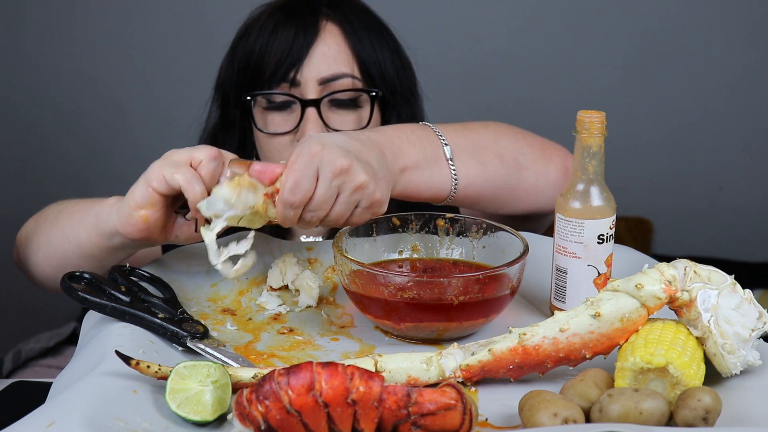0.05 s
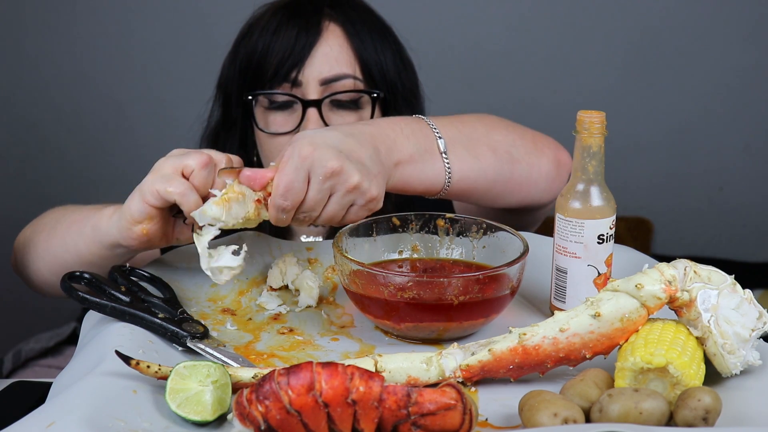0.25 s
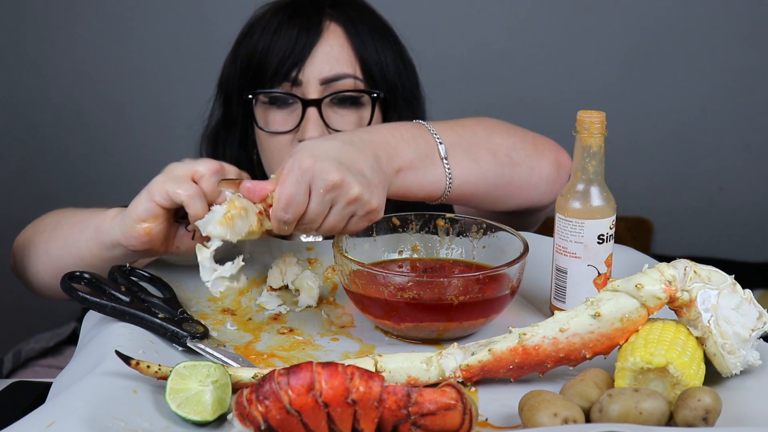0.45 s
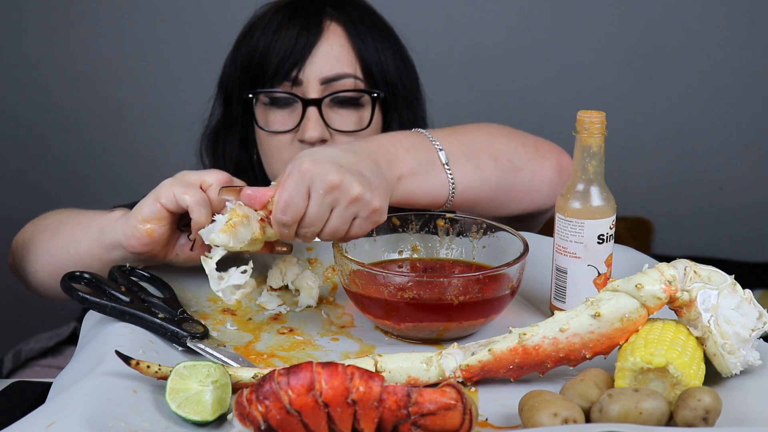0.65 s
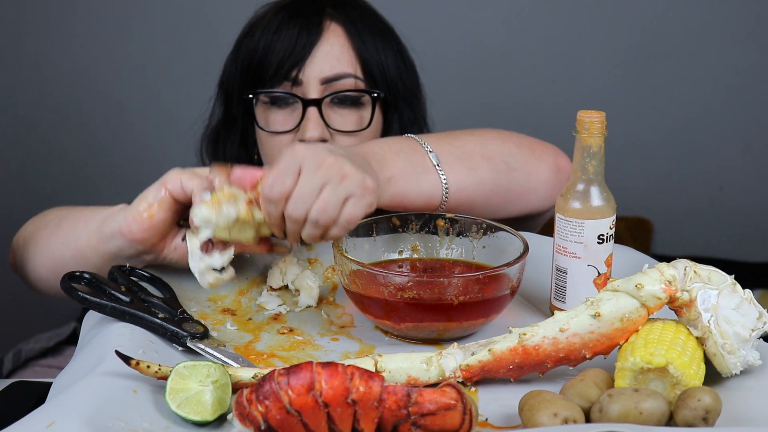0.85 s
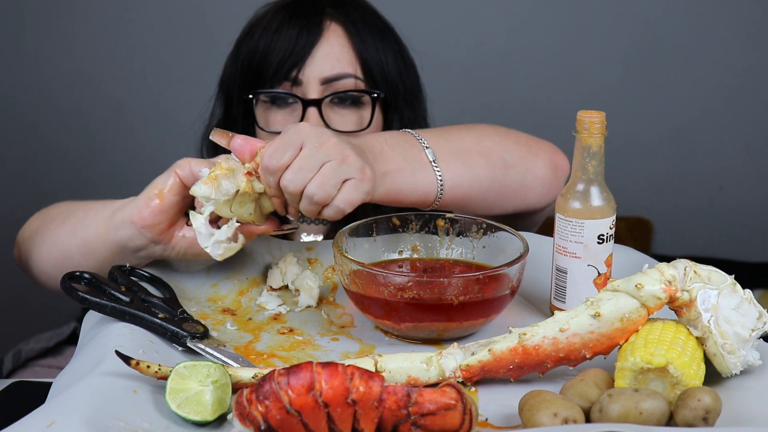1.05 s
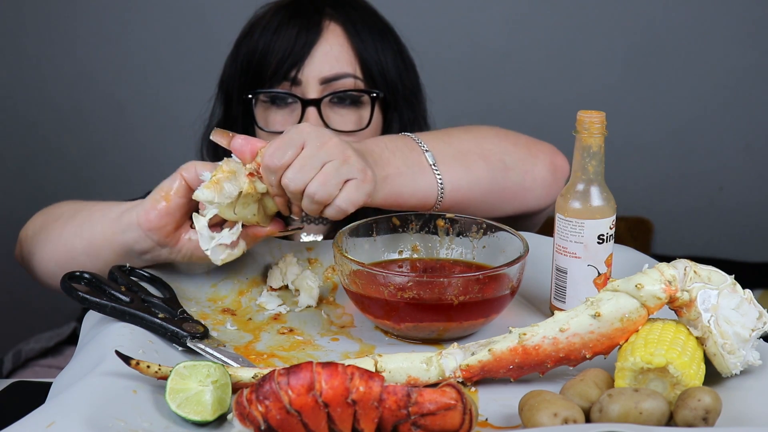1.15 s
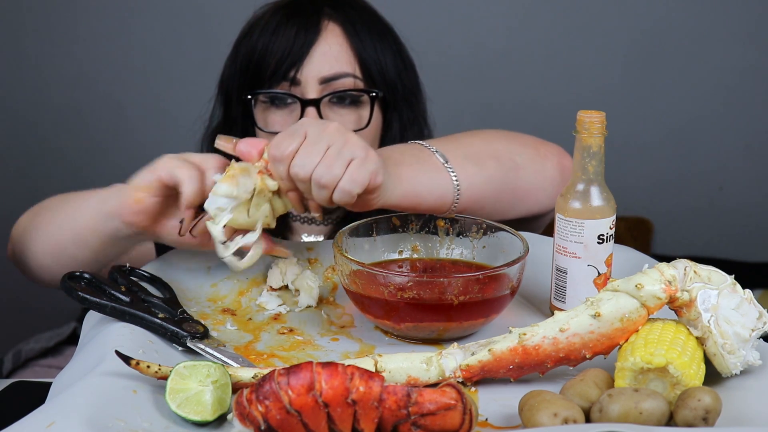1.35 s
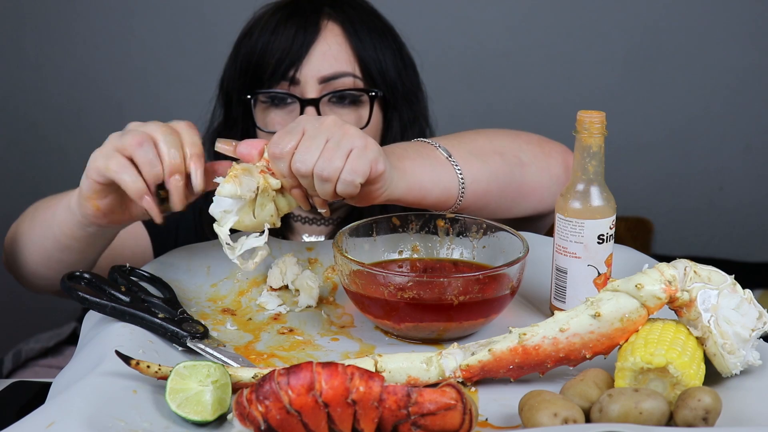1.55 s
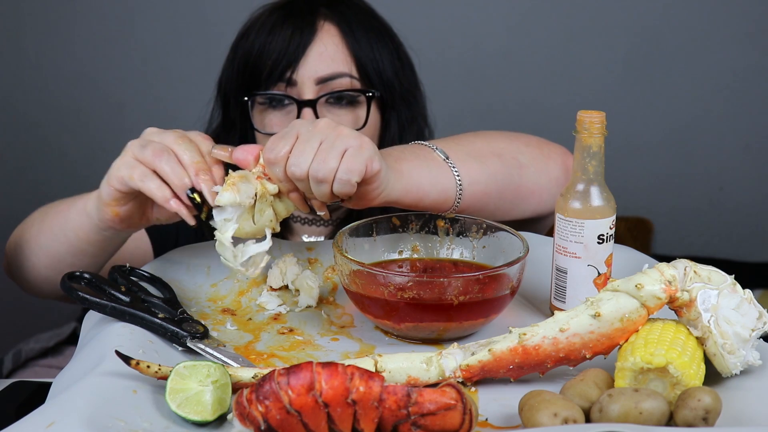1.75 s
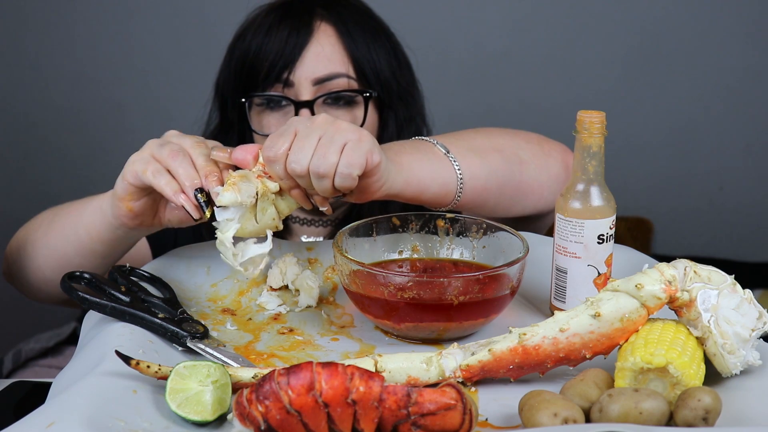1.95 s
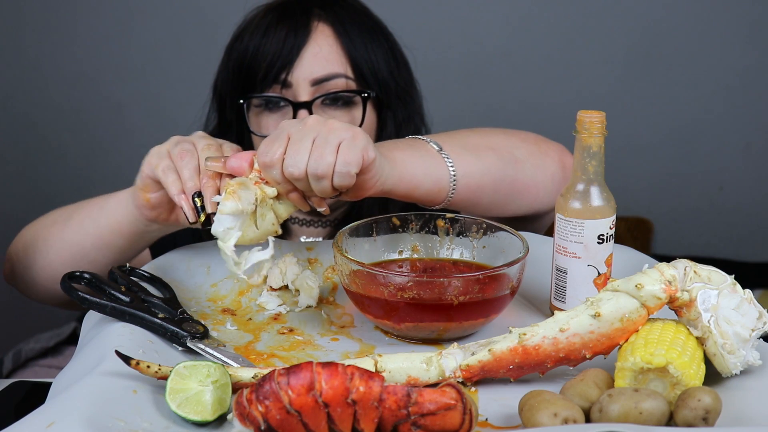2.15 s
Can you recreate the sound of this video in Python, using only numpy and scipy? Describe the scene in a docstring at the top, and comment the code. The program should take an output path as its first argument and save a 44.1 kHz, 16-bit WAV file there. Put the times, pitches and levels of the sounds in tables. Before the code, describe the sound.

A crab shell cracks loudly as it is pulled apart by hand, then small crackles and ticks.

```python
"""In a small bare room, a crab shell is pulled apart by hand at a table, close to a microphone.
Cracks, snaps and ticks are short noise bursts filtered by shell resonances and the room; peaks clip.
A low overload thump lies under the first big crack, a hollow shell knock under the second;
both are noise bursts through one low colour. A brushed glass bowl rings as decaying sine modes.
Beneath lie a wavering low ventilation drone of shaped noise, a sine hum and air hiss."""
import sys
import numpy as np
from scipy import signal
from scipy.fft import rfft, irfft
from scipy.io import wavfile
from scipy.ndimage import uniform_filter1d

SR = 44100
rng = np.random.default_rng(int(sys.argv[2]) if len(sys.argv) > 2 else 0)


def wav_out(sig):
    """Save sig, one row per channel (or a flat mono array), as 16-bit PCM at SR to the path in sys.argv[1]."""
    wavfile.write(sys.argv[1], SR, np.round(np.clip(np.atleast_2d(sig).T, -1, 1) * 32767).astype(np.int16))


N = 97020


def amp(db):
    """Logarithmic level: decibels become a linear gain."""
    return 10 ** (np.asarray(db) / 20)


def unit(x):
    """Power normalisation: scales a signal to an rms of one."""
    return x / np.sqrt(np.mean(x ** 2) + 1e-20)


def read(points, hz):
    """Spectral interpolation: reads a table along a log-frequency axis."""
    f, value = np.transpose(points)
    return np.interp(np.log(hz + 1), np.log(f + 1), value)


def add(mix, s, sound):
    """Superposition: sums a sound into the mix from s seconds on."""
    part = mix[max(round(s * SR), 0):][:len(sound)]
    part += sound[:len(part)]


def causal(db, size=2048):
    """Minimum phase: the Hilbert transform of log gain gives the sharpest causal impulse response."""
    mirrored_db = np.r_[db, db[-2:0:-1]]
    log_gain = np.log(amp(mirrored_db))
    spectrum = np.exp(np.conj(signal.hilbert(log_gain)))
    return np.fft.ifft(spectrum).real[:size]


def noise(points):
    """Spectral shaping: steady white noise weighted by a table, at unit rms."""
    white = rfft(rng.standard_normal(N))
    gain = amp(read(points, np.fft.rfftfreq(N, 1 / SR)))
    return unit(irfft(white * gain, N))


# Relative noise spectra of the drone and the air hiss: frequency_hz, density_db (per Hz)
DRONE_SPECTRUM = [(20, -17.5), (50, -14), (75, -21), (100, -6.5), (118, -4.5), (130, -1), (152, -0.5),
                  (185, -20), (235, -21), (320, -29), (600, -54.5)]
HISS_SPECTRUM = [(100, -4), (420, 0), (650, -6), (1100, -8.5), (2000, -13.5), (5000, -20), (10000, -24),
                 (16000, -27.5)]
# Slow wavering of drone and hum: time_s, gain_db
DRONE_SWELL = [(0, -5.5), (.1, -1.5), (.33, 1.5), (.5, 0), (.72, 2.5), (.79, -1), (.9, 2), (1.1, 2),
               (1.3, 1.5), (1.42, 4.5), (1.53, -2), (1.64, 2.5), (1.9, 0), (2.2, 1)]
DRONE_DB, HISS_DB = -48, -60.5  # rms levels, the drone's before its swell
HUM_HZ, HUM_DB = 129.1, -51.5  # rms level before the swell


def ventilation():
    """Amplitude modulation: a drone of shaped noise and a fan hum waver together over steady hiss."""
    t = np.arange(N) / SR
    hum = amp(HUM_DB) * unit(np.sin(2 * np.pi * HUM_HZ * t))
    drone = amp(DRONE_DB) * noise(DRONE_SPECTRUM) + hum
    swell = amp(np.interp(t, *np.transpose(DRONE_SWELL)))
    return drone * swell + amp(HISS_DB) * noise(HISS_SPECTRUM)


# Reverberation time of the room: frequency_hz, t60_s
ROOM_DECAY = [(300, 0.29), (1000, 0.39), (3000, 0.38), (7000, 0.37), (15000, 0.25)]
# Relative initial colour of the room tail: frequency_hz, gain_db
ROOM_TONE = [(100, -8.5), (500, 2.5), (1500, 0.5), (3500, 0), (7000, 2), (15000, 2)]
ROOM_DB, ROOM_BUILD_S = -7.5, 0.0088  # level before each source's own room gain; linear build-up


def room(size=26000):
    """Diffuse reverberation: noise builds up, then decays exponentially at its own rate in each band."""
    hz, t, bands = signal.stft(unit(rng.standard_normal(size)), SR, nperseg=256)
    decay_db = -60 * t / read(ROOM_DECAY, hz)[:, None]
    gain = amp(read(ROOM_TONE, hz)[:, None] + decay_db)
    tail = signal.istft(bands * gain, SR, nperseg=256)[1]
    tail = tail * np.minimum(np.arange(len(tail)) / SR / ROOM_BUILD_S, 1)
    return amp(ROOM_DB) * tail / np.linalg.norm(tail)


SNAP_RISE_S, SNAP_HOLD_S = 0.00015, 0.0008  # the hold is counted from the onset
HAND_RING_S = 0.001  # added to every t60


def burst(t60, size=2048):
    """Impulsive excitation: a sub-millisecond tear rings dense, hand-damped modes, even in spectrum."""
    t = np.arange(size) / SR
    rise = np.minimum(t / SNAP_RISE_S, 1)
    decay = amp(-60 * np.maximum(t - SNAP_HOLD_S, 0) / (t60 + HAND_RING_S))
    ring = rng.choice([-1, 1], size) * rise * decay
    # Inverting the smoothed spectrum leaves the colour to the body that follows
    broad_db = 10 * np.log10(uniform_filter1d(abs(rfft(ring)) ** 2, size=48) + 1e-12)
    return signal.fftconvolve(ring, causal(-broad_db))[:size]


# Colour of the shell, before each piece's own tone: frequency_hz, gain_db
SHELL_COLOUR = [(40, -33.5), (200, -30.5), (450, -28.5), (1000, -23), (1600, -14), (2200, -5.5), (2600, -6),
                (3200, -1.5), (4100, -3), (4800, -8.5), (6300, -7.5), (8500, -7), (11500, -9),
                (15500, -13.5)]
BASS_HZ, BODY_HZ, TREBLE_HZ, TOP_HZ = 1200, 1950, 6000, 10000  # anchors of each piece's tone
# Resonance peaks: spread divides the height and multiplies the half-width
LOW_RING_DB, LOW_WIDTH_HZ, HIGH_RING_DB, HIGH_WIDTH_HZ = 7, 220, 7.5, 230
SNAP_DB = 0.5  # gain common to all snaps


def piece(level_db, bass_db, treble_db, top_db, low_hz, high_hz, spread, size=2048):
    """Resonance: the breaking piece filters by the shell's colour, its own tone and two peaks."""
    hz = np.fft.rfftfreq(size, 1 / SR)
    tone = [(BASS_HZ, bass_db), (BODY_HZ, 0), (2 * BODY_HZ, 0),
            (TREBLE_HZ, treble_db), (TOP_HZ, top_db)]
    rings = [(LOW_RING_DB, low_hz, LOW_WIDTH_HZ), (HIGH_RING_DB, high_hz, HIGH_WIDTH_HZ)]
    peaks_db = sum(db / spread / (1 + ((hz - centre) / (width * spread)) ** 2)
                   for db, centre, width in rings)
    response = causal(read(SHELL_COLOUR, hz) + read(tone, hz) + peaks_db)
    return amp(SNAP_DB + level_db) * np.sqrt(size / 2) * response


# Early reflections, relative to the direct sound: delay_s, level_db
ECHOES = [(.006, -26.5), (.012, -16.5), (.0147, -24.5)]
DIRECT_SPREAD = 0.95
# The room gathers sound from all sides of the piece, so its resonances come back wider and flatter
ROOM_SPREAD = 3.3


def fracture(level_db, bass_db, treble_db, top_db, t60, low_hz, high_hz, room_db=0):
    """Direct and reflected sound: a snap, its echoes and a tail set by where the break faces."""
    colour = (level_db, bass_db, treble_db, top_db, low_hz, high_hz)
    direct = signal.fftconvolve(burst(t60), piece(*colour, DIRECT_SPREAD))
    out = amp(room_db) * signal.fftconvolve(room(), piece(*colour, ROOM_SPREAD))
    add(out, 0, direct)
    for delay, db in ECHOES:
        add(out, delay, amp(db) * direct)
    return out


# Fractures of the shell, before the common snap gain, hand ring and room level are added:
# start_s, level_db, bass_db, treble_db, top_db, ring_t60_s, low_resonance_hz, high_resonance_hz, room_db
SNAPS = [(0.1238, -38, 3.5, -3.5, 1, 0.0059, 2990, 6890, -1),
         (0.133, -27.5, 2, -5, -6.5, 0.0037, 2972, 12120, 0),
         (0.2274, -36.5, -2, 3, 11, 0.0098, 3217, 6500, -2),
         (0.229, -2.5, -4.5, 2, -8, 0.0095, 4157, 5400, 2.5),
         (0.2344, -16.5, 11, 8, 13.5, 0.005, 3050, 10470, 0.5),
         (0.2416, -18, -5, -5, 7, 0.0084, 3860, 6300, -0.5),
         (0.2535, -20.5, -7.5, -2.5, 11, 0.015, 3230, 10800, 3.5),
         (0.3506, -31.5, -8, -8.5, -2, 0.0057, 3250, 5530, -16),
         (0.3958, -29.5, -15, 2, 0, 0.0056, 4400, 12300, -2),
         (0.4445, -47.5, -10, 9, 14, 0.006, 4310, 12340, -9),
         (0.4549, -29, -4.5, 1, 1, 0.0096, 4300, 11500, 1.5),
         (0.5025, -48, 18, 11, 9, 0.008, 4300, 9520, 9),
         (0.5087, -21.5, 6, 11, 6.5, 0.0098, 2770, 8100, -1.5),
         (0.5359, -12.5, 0, 4, 2, 0.01, 3130, 7350, -0.5),
         (0.5378, -15, 1.5, 8.5, -0.5, 0.01, 3170, 7100, 0),
         (0.5479, -16, -27, -8.5, -8, 0.0048, 2850, 6910, 1),
         (0.85, -59.5, 25, 13, 4, 0.008, 3190, 6640, 1.5),
         (0.8825, -19.5, -8, -2.5, -6, 0.0075, 2739, 6630, 0),
         (0.9827, -13.5, 1, 8, 5, 0.0047, 3730, 6770, -2),
         (1.0381, -9, 0, -0.5, -5, 0.0061, 3420, 6600, 1.5),
         (1.0717, -23.5, -1.5, 4.5, 1.5, 0.0092, 3370, 6560, -7),
         (1.1001, -21.5, 1.5, 11.5, 9, 0.0064, 3250, 11500, -4),
         (1.1084, -17, -5, -15, -2.5, 0.0026, 3240, 10400, 3),
         (1.1936, -45, 12, 11, 11, 0.0062, 3150, 6560, 2),
         (1.2125, -22.5, -11.5, 4, 6, 0.0048, 3170, 12300, -1),
         (1.4174, -34, 13, -4.5, -9.5, 0.0086, 3060, 8150, -1),
         (1.5082, -59.5, 5.5, 14, 5.5, 0.008, 3350, 8450, 0.5),
         (1.7298, -48.5, 17, -5.5, -11, 0.0071, 2940, 5650, 2.5),
         (1.7411, -39.5, 3.5, -12, -10.5, 0.0095, 3010, 9500, -1),
         (1.7594, -39, -4.5, 4.5, 3, 0.0096, 2846, 8190, -1.5),
         (1.78, -33.5, -1, 2.5, -2.5, 0.0097, 4180, 11200, 0),
         (1.8152, -39, 10, -5, -10.5, 0.0068, 2410, 6200, 1),
         (1.8514, -36, 7.5, 4, 2, 0.0084, 2970, 11020, -1),
         (2.0981, -54.5, 14.5, 5, 2, 0.0071, 2450, 8260, 4),
         (2.1296, -53.5, 3, -9, 2, 0.018, 3040, 7890, -0.5)]
# A snap before the start still hangs in the room; its negative t60 makes the burst swell slightly:
# level_db, bass_db, treble_db, top_db, ring_t60_s, low_resonance_hz, high_resonance_hz
EARLIER_SNAP = (-14, -7.5, 4.5, 1.5, -1.83, 3301.5, 5801.5)
EARLIER_S = 0.12  # time before the start


def shell():
    """Brittle fracture: the shell gives way in separate snaps, over the tail of an earlier one."""
    out = np.zeros(N)
    add(out, 0, fracture(*EARLIER_SNAP)[round(EARLIER_S * SR):])
    for start, *snap in SNAPS:
        add(out, start, fracture(*snap))
    return out


# Low colour shared by the thump and the knock: frequency_hz, gain_db
LOW_COLOUR = [(60, -20), (280, -8.5), (500, -3), (720, -1.5), (950, 0.5), (1250, -5.5), (1700, -21),
              (5000, -50.5)]
# An overload thump under the first big crack, then a hollow shell knock under the second,
# before hand ring and room level are added: start_s, level_db, ring_t60_s, room_db
THUMP_AND_KNOCK = [(0.2291, -9.5, 0.0037, -11.5), (.5363, -16, 0.0067, 0)]


def thump_and_knock(size=2048):
    """Source and filter: noise bursts and room tails through one low colour give thump and knock."""
    out = np.zeros(N)
    hz = np.fft.rfftfreq(size, 1 / SR)
    low_filter = np.sqrt(size / 2) * causal(read(LOW_COLOUR, hz))
    for start, db, t60, room_db in THUMP_AND_KNOCK:
        paths = amp(room_db) * room()
        add(paths, 0, burst(t60))
        add(out, start, amp(db) * signal.fftconvolve(paths, low_filter))
    return out


# Modes of the glass bowl, before each touch's level and ring factor: frequency_hz, level_db, t60_s
BOWL_MODES = [(944, 1, 0.49), (2294, 3.5, 0.32), (6090, 2.5, 0.16), (8430, 4.5, 0.065),
              (14000, -5.5, 0.065)]
# Touches of the bowl: start_s, first_mode_db, second_mode_db, third_mode_db, upper_modes_db,
# contact_s (linear rise), ring_factor (multiplies t60)
TOUCHES = [(.79, -85, -64, -66, -61.5, 0.014, 1.34), (1.327, -46, -62, -62, -38, .028, 0.93),
           (1.42, -75.5, -55, -75, -60, 0.0066, 1.53), (1.8157, -52.5, -42, -44.5, -46, 0.0037, 0.8)]


def bowl():
    """Modal synthesis: light touches excite decaying sine modes of the glass in differing balance."""
    out, t = np.zeros(N), np.arange(SR // 2) / SR
    for start, *strengths_db, contact, ring in TOUCHES:
        rise = np.minimum(t / contact, 1)
        # The two upper modes share the last strength
        for (hz, db, t60), touch_db in zip(BOWL_MODES, strengths_db + strengths_db[-1:]):
            decay = amp(db + touch_db - 60 * t / (t60 * ring))
            add(out, start, rise * decay * np.sin(2 * np.pi * hz * t))
    return out


def scene():
    """Linear superposition: ventilation, shell, thump and knock, and bowl sum to one channel."""
    return (ventilation() + shell() + thump_and_knock() + bowl())[None]


OVERLOAD = 1.0  # clipping level, full scale
EDGE_HZ = 16000  # low-pass cutoff


def record(dry):
    """Hard clipping, then band limiting: overloads are cut flat before a linear-phase low-pass."""
    clipped = np.clip(dry, -OVERLOAD, OVERLOAD)
    low_pass = signal.firwin(511, EDGE_HZ, window=("kaiser", 8), fs=SR)
    return signal.oaconvolve(clipped, low_pass[None], "same")


dry = scene()
out = record(dry)
wav_out(out)
```